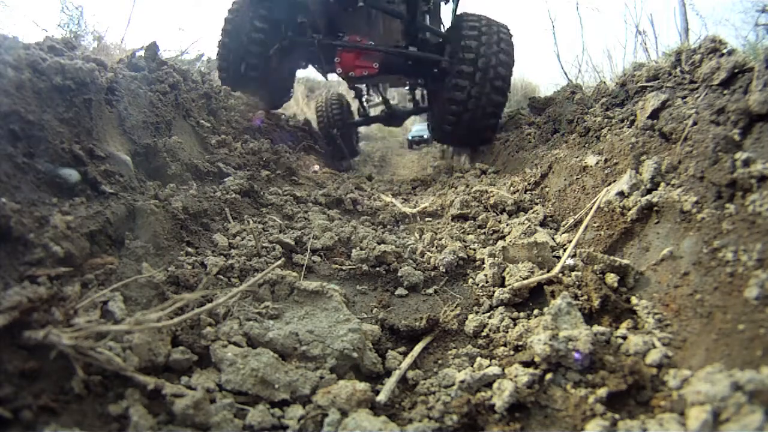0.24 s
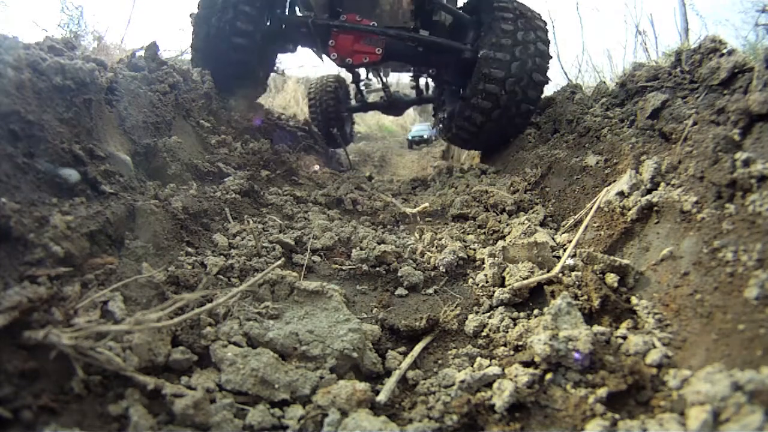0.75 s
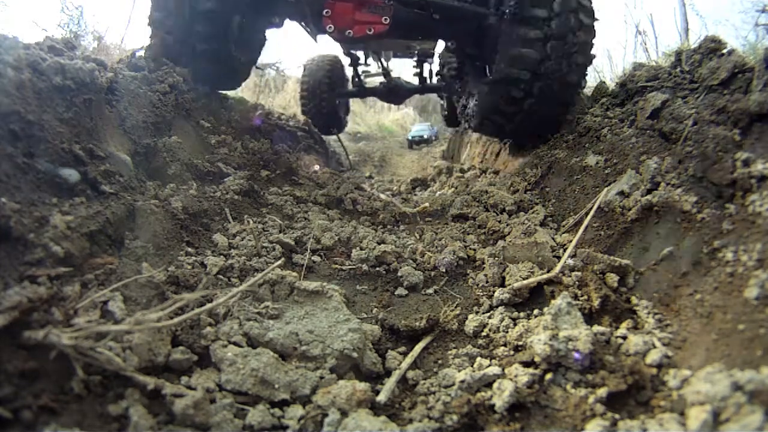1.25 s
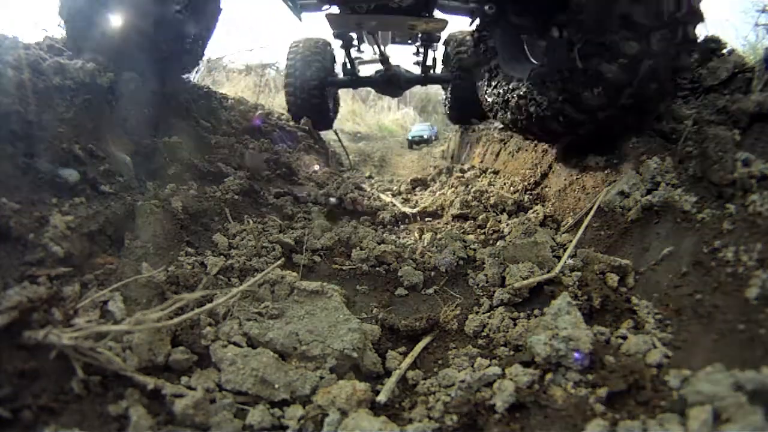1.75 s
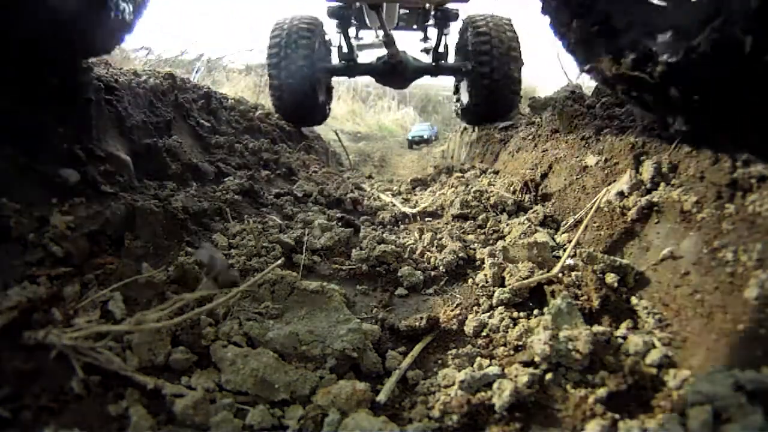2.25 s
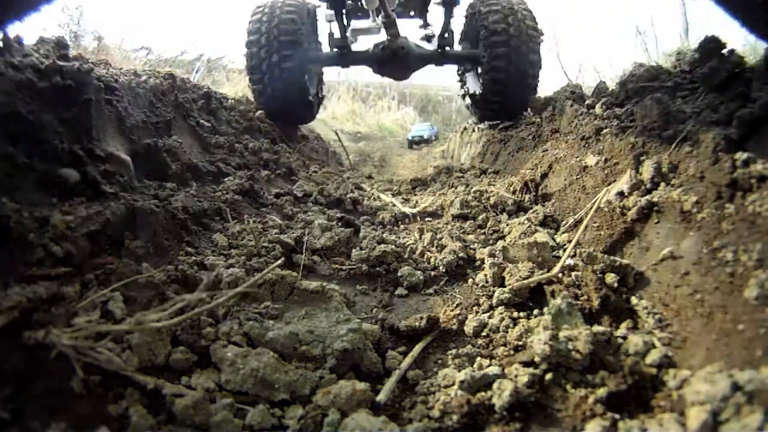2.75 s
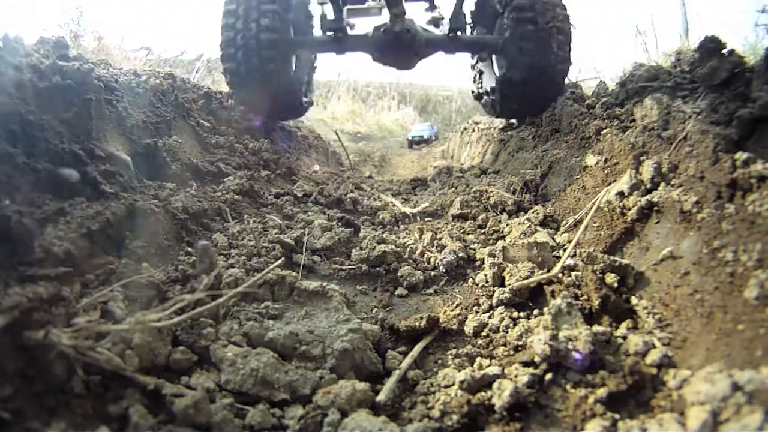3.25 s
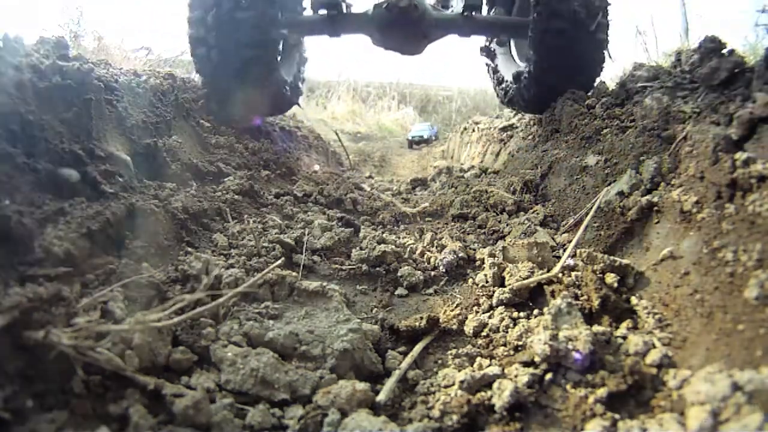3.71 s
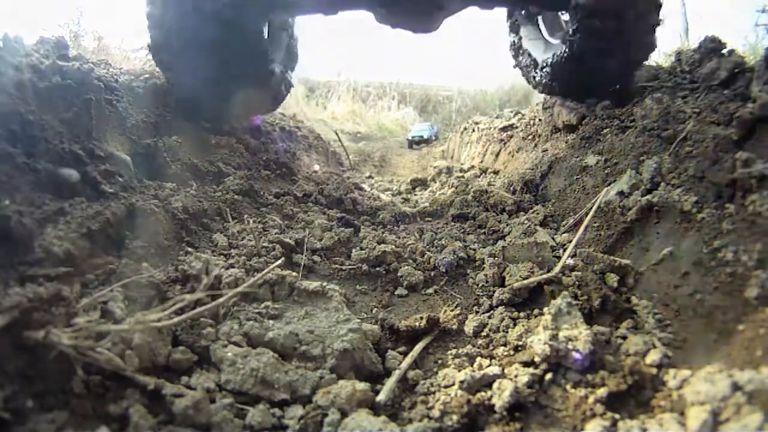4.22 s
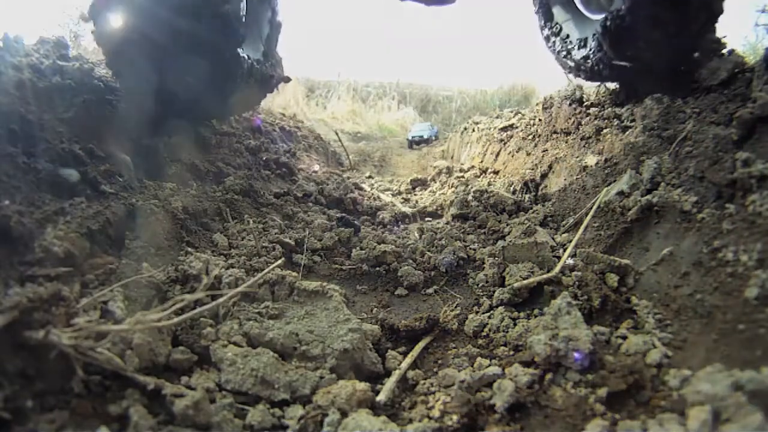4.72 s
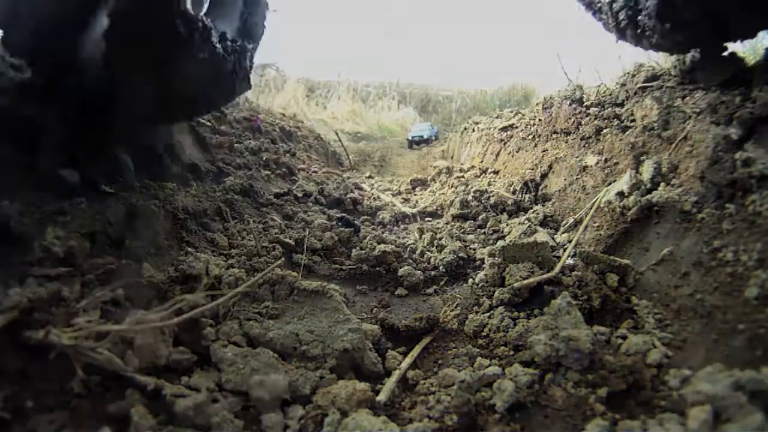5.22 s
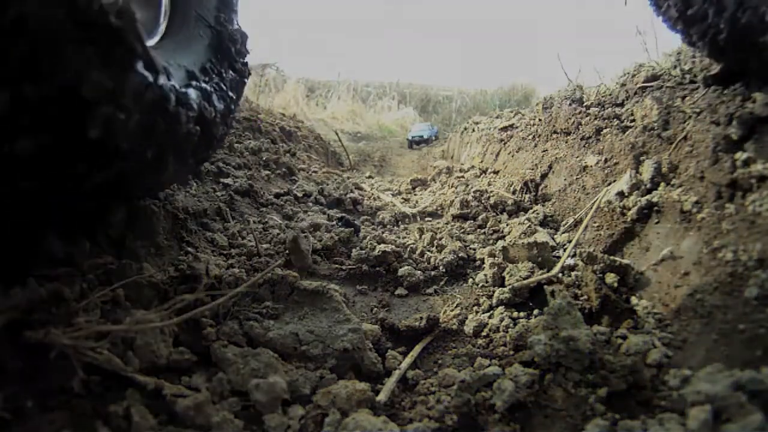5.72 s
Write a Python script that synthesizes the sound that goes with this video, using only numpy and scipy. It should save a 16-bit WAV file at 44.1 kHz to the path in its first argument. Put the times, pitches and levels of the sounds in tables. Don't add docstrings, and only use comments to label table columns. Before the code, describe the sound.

Thin, gritty gear whir of a toy-sized crawler swells overhead with knocks and ticks, a loud stone snap, then fades over faint hiss.

```python
import sys
import numpy as np
from scipy import signal
from scipy.fft import rfft, irfft
from scipy.io import wavfile
from scipy.ndimage import uniform_filter1d

SR = 44100
rng = np.random.default_rng(int(sys.argv[2]) if len(sys.argv) > 2 else 0)


def makeup_ratio(level_db):
    decades = np.asarray(level_db, float) / 20
    return 10 ** decades


def int16_out(signal):
    q = np.round(np.clip(np.atleast_2d(signal).T, -1, 1) * 32767)
    wavfile.write(sys.argv[1], SR, q.astype(np.int16))


N = 263277
TIME = np.arange(N) / SR


def level(x, db=0):
    return x * makeup_ratio(db) / np.sqrt(np.mean(x ** 2))


def curves(table):
    s, *columns = np.transpose(table)
    return [np.interp(TIME, s, c) for c in columns]


def walk(rate_hz):
    hold = int(SR / rate_hz)
    steps = np.repeat(rng.standard_normal(N // hold + 1), hold)
    return level(uniform_filter1d(steps, hold)[:N])


def swells(table, floor_db):
    bumps = sum(makeup_ratio(db) * np.exp(-((TIME - s) / half_s) ** 2) for s, half_s, db in table)
    return 20 * np.log10(makeup_ratio(floor_db) + bumps)


def nearness(overhead_s, reach_s):
    return -10 * np.log10(1 + ((TIME - overhead_s) / reach_s) ** 2)


def colour(x, table):
    hz, db = np.transpose(table)
    bins_hz = np.fft.rfftfreq(N, 1 / SR)
    gain_db = np.interp(np.log(bins_hz + 1), np.log(hz), db)
    return irfft(rfft(x) * makeup_ratio(gain_db), N)


def body(x, modes):
    out = 0
    for hz, width_hz, db in modes:
        b, a = signal.iirpeak(hz, hz / (1.59 * width_hz), SR)
        once = signal.lfilter(b, a, x)
        out = out + level(signal.lfilter(b, a, once), db)
    return level(out)


def clicks(rate_hz, scatter_db):
    hit = rng.random(N) < rate_hz / SR
    return hit * rng.choice([-1., 1.], N) * makeup_ratio(scatter_db * rng.exponential(size=N))


def ring(hz, t60_s, length_s=.06):
    t = np.arange(int(length_s * SR)) / SR
    return np.sin(2 * np.pi * hz * t) * np.exp(-np.log(1000) * t / t60_s)


def add(out, s, x):
    i = int(s * SR)
    out[i:i + len(x)] += x[:N - i]


# (frequency [Hz], density [dB per Hz])
AIR = [(15, -24), (30, -1), (50, 0.5), (110, -0.5), (500, -10.5), (1060, -14.5), (2700, -14), (4200, -18),
       (5500, -23.5), (6200, -40), (7000, -90)]


def air():
    return level(colour(rng.standard_normal(N), AIR), -58)


# (time [s], shaft turns [Hz], level [dB])
DRIVE = [(0.0, 72.7, -65), (0.9, 75.2, -59.5), (1.12, 72.3, -57.5), (1.36, 91.5, -51.5),
         (1.7, 106.9, -50.5), (2.1, 98.6, -50), (2.24, 90.4, -49), (2.36, 85, -52), (2.7, 68.3, -50),
         (3.1, 79.3, -49.5), (3.42, 79.8, -48), (3.75, 64.1, -50.5), (4.15, 72.1, -48.5), (4.6, 61, -51.5),
         (5.05, 64.1, -49), (5.3, 94, -45.5), (5.5, 57.2, -51.5), (5.97, 42.45, -58.5)]
# (overhead time [s], reach [s], level [dB])
PASSING = [
    (2.17, 1.06, -7),
    (4.39, 1.02, -1.5),
    (2.86, 1.2, 2),
    (1.6, 0.75, 3),
]
# (time [s], half length [s], level [dB])
AXLES_STRAIN = [(3.3, .12, -10), (4.76, 0.15, -2), (5.23, 0.07, -11)]
# (time [s], half length [s], level [dB])
PLATE_AGAIN = [(1.16, .08, -5), (4.15, 0.34, -11.5), (4.85, 0.097, -9), (5.2, 0.17, -9.5)]


def parts_db():
    near_db = np.array([db + nearness(s, reach_s) for s, reach_s, db in PASSING])
    near_db[1] = swells(AXLES_STRAIN, near_db[1])
    near_db[-1] = swells(PLATE_AGAIN, near_db[-1])
    drive_db = curves(DRIVE)[1]
    return drive_db + near_db - 10 * np.log10(np.sum(makeup_ratio(2 * near_db), axis=0))


# (frequency [Hz], width [Hz], level [dB])
LINKS = [(1535, 140, -0.5), (1675, 120, 1.5), (1960, 71, 1)]
AXLES = [(2183, 33, -0.5), (2269, 130, 8.5), (2416, 89, -5.5), (4180, 180, -9.5), (5250, 680, -12)]
GEARBOX = [(3300, 97, -11.5), (3376, 70, -3.5), (3444, 51, -6.5), (2886, 150, -13), (4600, 440, -14.5),
           (5380, 670, -26)]
PLATE = [(3660, 130, 4.5), (3790, 57, 1), (3898, 28, -1), (3580, 190, -6), (4650, 390, -14.5),
         (5250, 120, -15)]


def gears(turns):
    spur_db = 1.47 * np.sin(2 * np.pi * turns / 3)
    shaft_db = 0.38 * np.sin(2 * np.pi * turns)
    out = 0
    for modes, part_db in zip((LINKS, AXLES, GEARBOX, PLATE), parts_db()):
        teeth = level(clicks(rate_hz=4000, scatter_db=2.07))
        teeth = teeth * makeup_ratio(spur_db + shaft_db + 1.34 * walk(60))
        out = out + makeup_ratio(part_db) * body(teeth, modes)
    return out


# (time [s], tone level [dB], octave level [dB])
WHISTLE = [(0.0, -80, -83), (0.4, -71, -90), (1.1, -70.5, -83), (1.5, -73, -77), (2.1, -63, -74),
           (2.3, -65.5, -79), (2.5, -64.5, -73), (2.8, -64.5, -82), (3.25, -71, -72.5), (3.55, -69, -69),
           (3.75, -61, -79), (3.95, -76, -64.5), (4.2, -58.5, -64.5), (4.5, -68, -63), (5.1, -75, -66),
           (5.3, -80, -83), (5.5, -73, -78), (5.97, -70, -74)]
# (time [s], half length [s], level [dB])
TONE_SIDES = [(.8, 0.55, -83), (2.45, .15, -69), (3.2, 0.28, -59.5), (3.9, 0.28, -62.5), (5.33, .1, -60),
              (5.75, 0.31, -69)]
OCTAVE_SIDES = [(.0, .2, -83), (2.75, .35, -82), (4.0, .3, -83), (4.9, 0.35, -68), (5.5, 0.25, -76)]


def whistle(turns):
    chop_hz = 2966
    tone_db, octave_db = curves(WHISTLE)
    low_db, side_db = swells(TONE_SIDES, -88.5), swells(OCTAVE_SIDES, -94)
    chop, shaft = 2 * np.pi * chop_hz * TIME, 2 * np.pi * turns
    lines = [(tone_db, chop), (low_db, chop - shaft), (low_db - 9, chop + shaft),
             (octave_db + 1, 2 * chop), (side_db, 2 * chop - shaft), (side_db, 2 * chop + shaft)]
    return sum(np.sqrt(2) * makeup_ratio(db + 1.66 * walk(14)) * np.sin(phase) for db, phase in lines)


# (frequency [Hz], width [Hz], level [dB])
GROUND = [(638.6, 29, -8), (785, 77, -6), (1060, 68, 1.5), (1152, 33, -4)]
# (time [s], half length [s], level [dB])
SCUFF = [
    (0.409, 0.032, -53.5),
    (0.112, 0.0065, -54),
    (4.8, 0.075, -62),
]


def tyres():
    rolling = body(clicks(rate_hz=2500, scatter_db=1.2), GROUND)
    out = rolling * makeup_ratio(-62.5 + nearness(overhead_s=2.93, reach_s=1.65))
    dense = clicks(rate_hz=2500, scatter_db=3.0)
    crumbs = body(dense, [(1520, 380, 4.0), (1960, 560, 7.5), (3660, 460, 3), (5100, 300, 0)])
    for s, half_s, db in SCUFF:
        out = out + makeup_ratio(db) * np.exp(-((TIME - s) / half_s) ** 2) * crumbs
    return out


# (time [s], peak level [dB], pitch [Hz])
GRIT = [(0.226, -50, 665), (0.771, -47, 1030), (1.123, -46.5, 658), (1.321, -48, 866), (1.609, -48, 1700),
        (1.795, -43.5, 1120), (2.698, -46.5, 647), (2.883, -51, 1070), (2.96, -40.5, 630),
        (3.008, -40.5, 1070), (3.256, -42.5, 1960), (3.483, -41, 1620), (3.523, -42, 830),
        (3.669, -48, 1060), (3.7905, -35, 1118), (3.7958, -32.5, 1563), (3.827, -39, 625),
        (4.134, -37.5, 1270), (4.19, -45.5, 1416), (4.248, -41.5, 1420), (4.708, -45.5, 1024),
        (4.947, -40.5, 830), (5.071, -44.5, 1086), (5.244, -43.5, 1044), (5.454, -47.5, 853),
        (5.515, -42, 890), (5.904, -41, 1410)]
# (frequency [Hz], level [dB], t60 [s])
CASE = [(802, -16, 0.027), (1035, -7, 0.025), (1420, -1, 0.02), (1955, -5, 0.023), (2380, -6.5, 0.023),
        (2780, -9.5, 0.017), (3070, -17, 0.014), (3590, -5, 0.018), (3920, -7, 0.019), (4270, -12.5, 0.011),
        (4770, -11, 0.0079), (5300, -7.5, 0.0071)]


def grit():
    t, edge_t = np.arange(len(ring(1, 1))) / SR, np.arange(900) / SR
    out, edge = np.zeros((2, N))
    rise = 1 - np.exp(-t / 0.00056)
    for s, db, hz in GRIT:
        t60_s = 0.036 * (1000 / hz) ** .4
        above_hz = hz * (1.2 + 0.25 * rng.random())
        below_hz = hz * (0.62 + 0.14 * rng.random())
        grain = 0.74 * ring(hz, t60_s) - 0.34 * ring(above_hz, t60_s) - 0.33 * ring(below_hz, t60_s)
        add(out, s, makeup_ratio(db) * rise * grain)
        add(edge, s, makeup_ratio(db - 10) * np.exp(-edge_t / 0.0059))

    stone_s, stone_db = 3.5961, -12
    stone = sum((-1) ** k * makeup_ratio(db) * ring(hz, t60_s) for k, (hz, db, t60_s) in enumerate(CASE))
    stone = stone * (1 - np.exp(-t / .0004))
    add(out, stone_s, makeup_ratio(stone_db) * stone)
    add(edge, stone_s, makeup_ratio(stone_db - 15) * np.exp(-edge_t / 0.0024))

    crumble = body(rng.standard_normal(N), [(709.7, 360, 1.5), (1520, 1160, 3.5), (2320, 780, -22)])
    no_bass = signal.butter(3, 480, "high", fs=SR, output="sos")
    return signal.sosfilt(no_bass, out + edge * crumble)


def strand(hz, db, wobble_hz, flicker_db):
    phase = 2 * np.pi * np.cumsum(hz + wobble_hz * walk(70)) / SR
    return np.sqrt(2) * makeup_ratio(db + flicker_db * walk(35)) * np.sin(phase)


def sounding(start_s, end_s):
    return np.clip(np.minimum(TIME - start_s, end_s - TIME) / 0.031, 0, 1)


# (start [s], end [s], from [Hz], to [Hz], level [dB])
STRANDS = [(0.991, 1.12, 2190, 2270, -68), (1.527, 1.65, 1663, 1700, -63),
           (1.951, 2.302, 3627, 3300, -55.5), (2.022, 2.299, 3764, 3830, -59),
           (2.031, 2.261, 1730, 1577, -64.5), (2.277, 2.434, 1675, 1740, -61),
           (2.781, 3.051, 2135, 2130, -62.5), (3.662, 3.924, 1039, 1061, -63.5),
           (4.454, 4.904, 2155, 2130, -61.5), (4.6, 5.349, 2320, 2266, -60.5),
           (1.105, 1.322, 2250, 2280, -71), (2.602, 3.0, 3303, 3420, -62.5),
           (3.002, 3.304, 3390, 3460, -53), (3.302, 3.502, 3440, 3330, -59)]


def mesh():
    whine_db, sway_hz, sway_period_s, sway_top_s = -53, 85, .3, 1.46
    whine_hz = 3725 + sway_hz * np.cos(2 * np.pi * (TIME - sway_top_s) / sway_period_s)
    pair = strand(whine_hz, whine_db, 8.72, 2.3)
    pair = pair + strand(.608 * whine_hz, whine_db - 12, 6, 1.9)
    out = sounding(1.33, 2.05) * pair
    for start_s, end_s, from_hz, to_hz, db in STRANDS:
        glide_hz = np.interp(TIME, [start_s, end_s], [from_hz, to_hz])
        out = out + sounding(start_s, end_s) * strand(glide_hz, db, 8.06, 3.0)
    return out


# (time [s], peak level [dB], share in the axles [0-1])
KNOCKS = [(1.029, -43, 1), (1.3834, -42, .02), (1.5224, -40, .02), (1.788, -32, 0.05), (2.0295, -35, 0.07),
          (2.0875, -33, 0.1), (2.158, -41, .02), (2.2398, -41, 0.1), (2.5823, -34, 0), (2.6194, -34, 0.05),
          (2.6626, -35, .02), (2.7024, -34, .02), (2.8664, -34, 0.4), (3.04, -31.5, .04), (3.101, -32.5, 0),
          (3.1881, -35.5, 0.03), (3.2549, -33, .02), (3.4092, -29, 0.12), (3.4481, -31.5, 0.24),
          (3.5056, -33, .9), (3.705, -33, 0.05), (4.1066, -37.5, 0.05), (4.2313, -38, .02),
          (4.7134, -33, 0.9), (4.845, -32.5, 0.4), (5.0824, -36, 0.22), (5.131, -38, .2),
          (5.1975, -34, .85), (5.2841, -33, .2), (5.306, -29.5, .02)]


def knocks():
    upper, lower = np.zeros((2, N))
    t = np.arange(2000) / SR
    fade = (1 - np.exp(-t / 0.0016)) * np.exp(-t / 0.0077)
    for s, db, axle_share in KNOCKS:
        axle_share = np.clip(axle_share, 0, 1)
        add(upper, s, makeup_ratio(db - 5) * np.sqrt(1 - axle_share) * fade)
        add(lower, s, makeup_ratio(db - 7.5) * np.sqrt(axle_share) * fade)
    *_, gearbox_db, plate_db = parts_db()
    share = 1 / (1 + makeup_ratio(2.6 * (plate_db - gearbox_db)))
    gearbox, plate, axles = (body(rng.standard_normal(N), modes[:3]) for modes in (GEARBOX, PLATE, AXLES))
    return upper * (np.sqrt(share) * gearbox + np.sqrt(1 - share) * plate) + lower * axles


# (frequency [Hz], level [dB])
DIP = [(2440, 0), (2580, -1), (2740, -3), (2840, 0)]
# (frequency [Hz], side minus mid [dB])
SIDE_SHAPE = [(60, -42), (110, -33), (200, -30.5), (380, -22), (700, -20.5), (1290, -23.5), (2380, -26.5),
              (4400, -19), (8120, -4), (15000, -35)]


def scene():
    turns = np.cumsum(curves(DRIVE)[0]) / SR
    echoed = colour(air() + gears(turns) + knocks(), DIP)
    mid = echoed + whistle(turns) + tyres() + grit() + mesh()
    side = colour(air(), SIDE_SHAPE)
    return mid + side * np.array([[1], [-1]])


def roll_off(x):
    return signal.sosfilt(signal.butter(12, 16490, fs=SR, output="sos"), x)


def record(dry):
    hold = 4
    fast = signal.resample_poly(dry, 160, 147, axis=1)
    held = np.repeat(fast[:, ::hold], hold, axis=1)
    out = signal.resample_poly(held, 147, 160, axis=1)[:, :N]
    out = np.pad(out, ((0, 0), (0, N - out.shape[1])))
    lowpass = signal.ellip(10, .1, 60, 15330, fs=SR, output="sos")
    out = signal.sosfiltfilt(lowpass, out)
    return roll_off(out)


dry = scene()
out = record(dry)
int16_out(out)
```